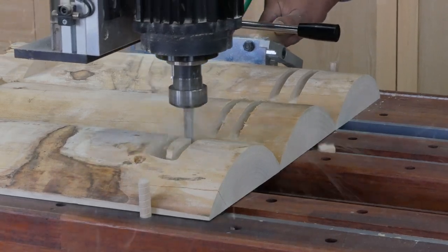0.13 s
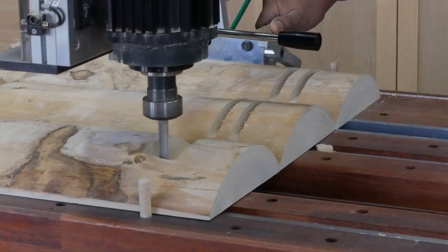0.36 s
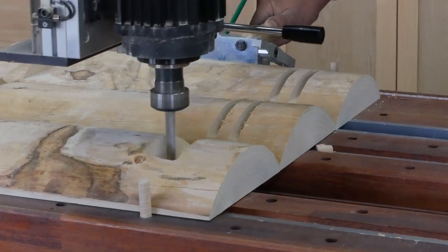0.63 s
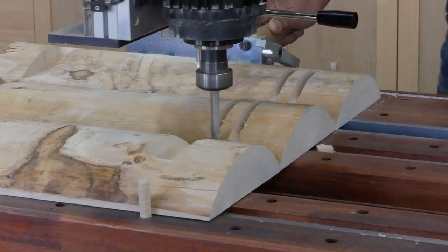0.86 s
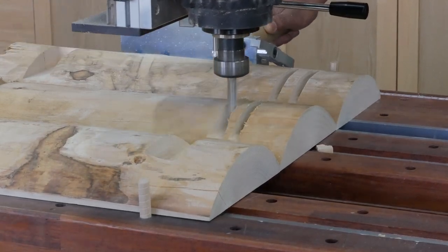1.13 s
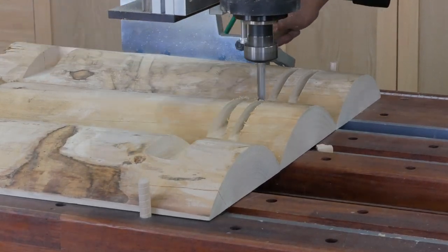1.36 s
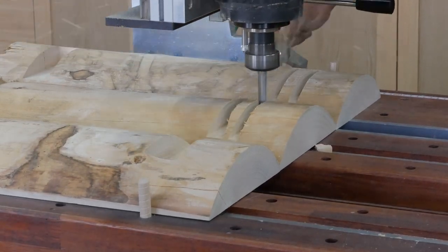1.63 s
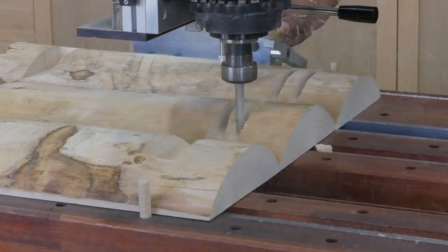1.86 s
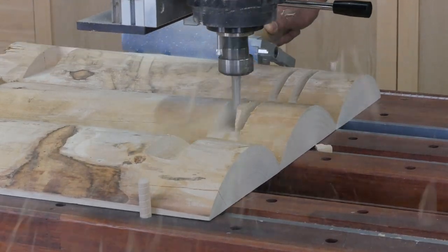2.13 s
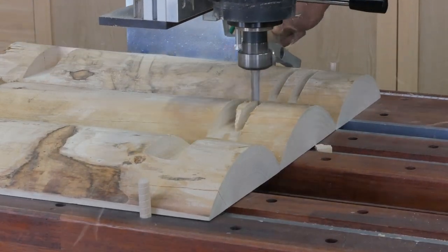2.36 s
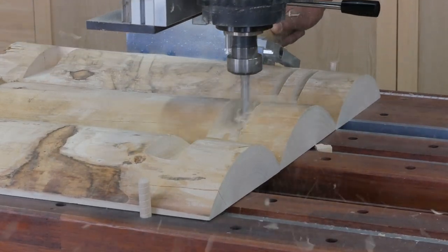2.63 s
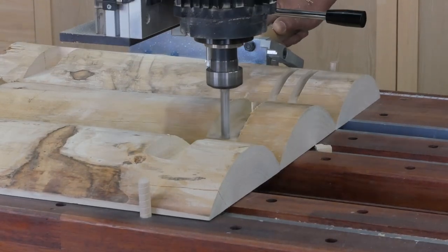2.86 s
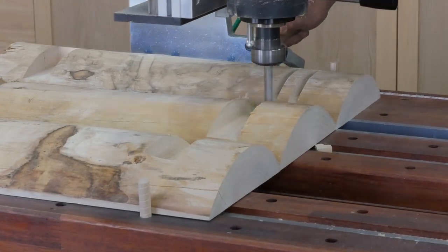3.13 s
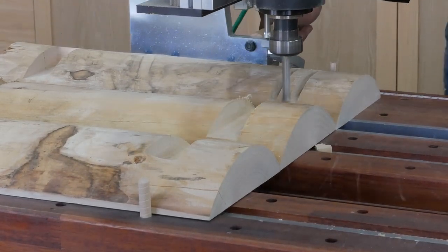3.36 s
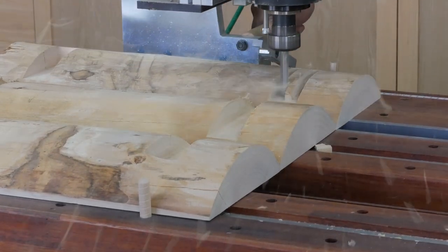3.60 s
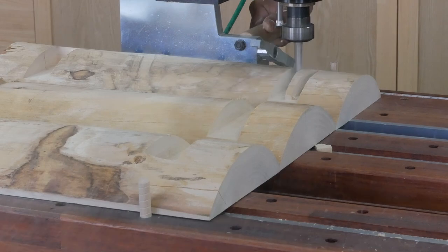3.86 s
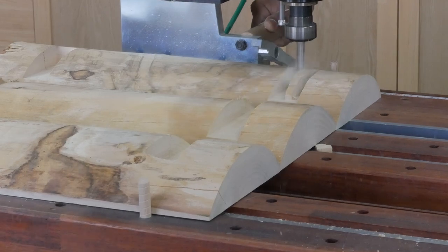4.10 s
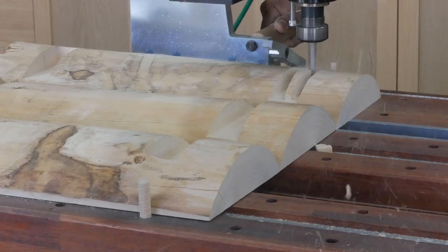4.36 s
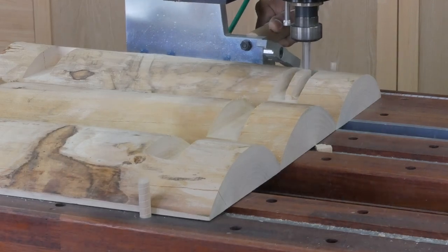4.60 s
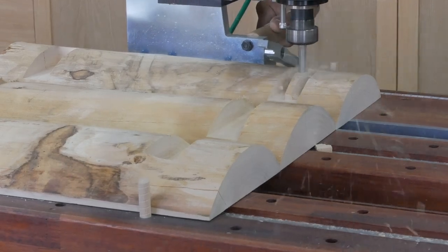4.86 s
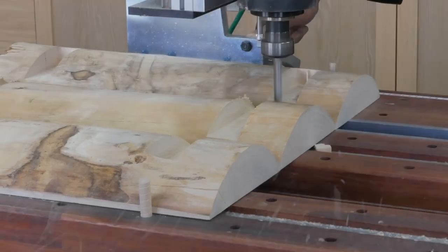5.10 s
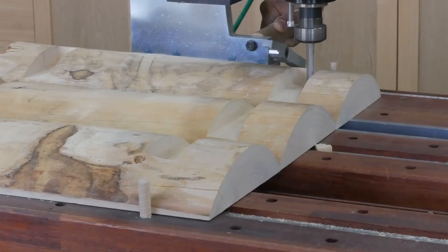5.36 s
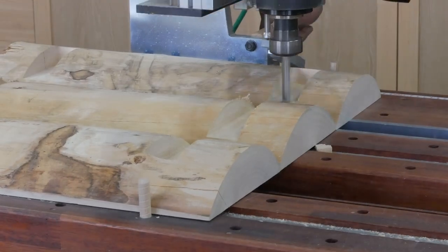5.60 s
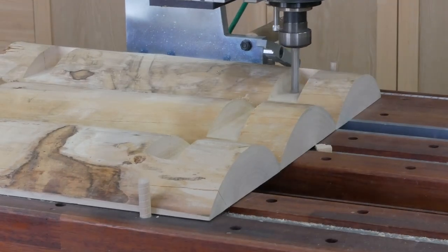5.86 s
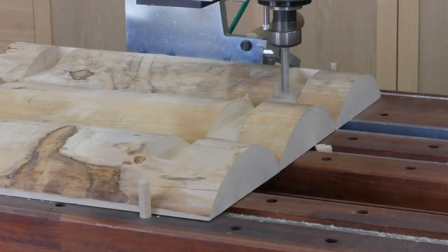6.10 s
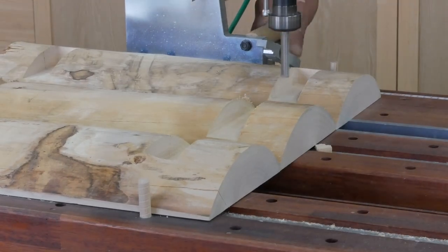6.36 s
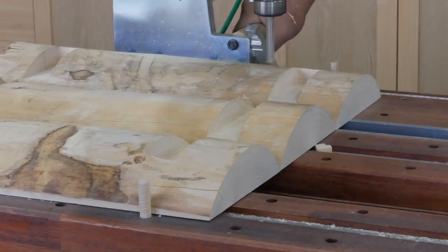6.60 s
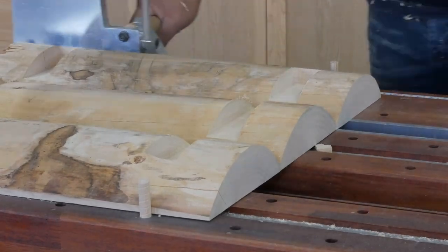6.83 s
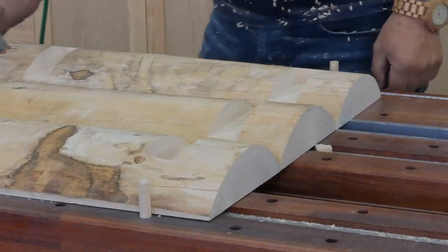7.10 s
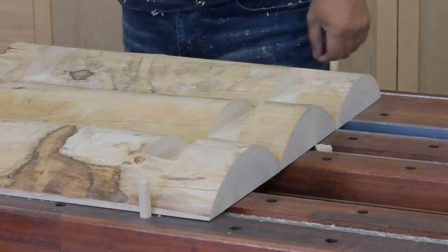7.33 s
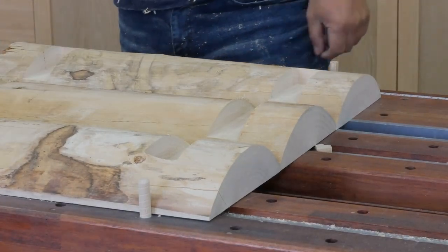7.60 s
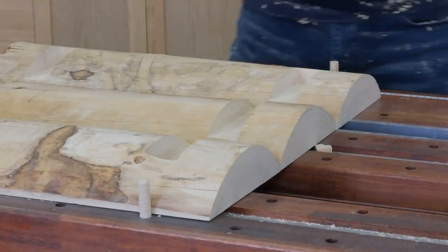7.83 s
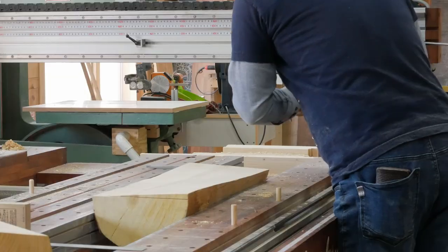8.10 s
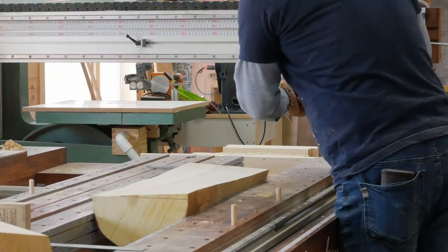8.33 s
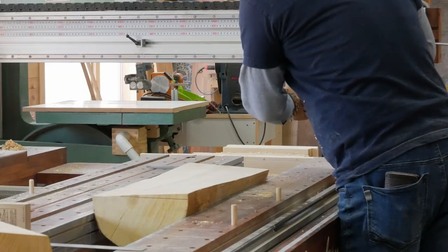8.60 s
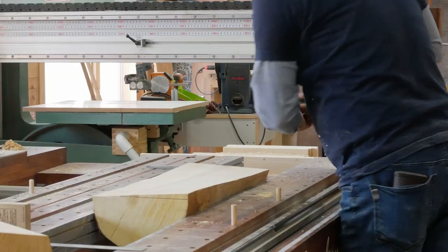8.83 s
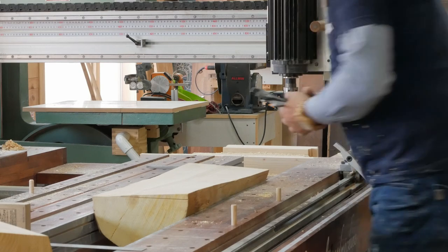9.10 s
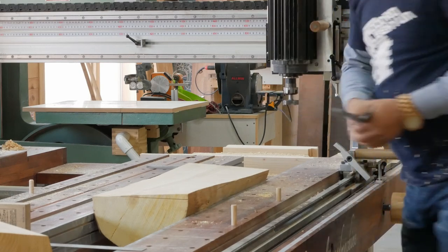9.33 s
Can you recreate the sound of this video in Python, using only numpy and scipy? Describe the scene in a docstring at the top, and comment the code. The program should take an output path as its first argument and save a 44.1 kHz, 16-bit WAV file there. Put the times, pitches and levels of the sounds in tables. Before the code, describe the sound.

High-speed router bit chews through wood with swelling whine and brief squeals, glides down to a stop, then light metallic clinks in a quiet shop.

```python
"""The first thing you hear is the whine of a fast electric spindle, over a roar of air and chips.
Its two-flute bit cuts slots in wood; each bite swells one tone of the whine, and now and then the bit chatters.
The spindle is switched off: its tones, locked to the rotor, glide down together while the roar dulls.
A hard cut leads to another spot in the quiet shop, with soft air noise and the hum of a far machine.
There metal tools clink on a bench: short bursts of noise ring the resonances of tool and bench."""
import sys
import numpy as np
from scipy import signal
from scipy.fft import rfft, irfft, next_fast_len
from scipy.io import wavfile
from scipy.ndimage import uniform_filter1d, map_coordinates

SR = 44100
rng = np.random.default_rng(int(sys.argv[2]) if len(sys.argv) > 2 else 0)


def wav_record(signal):
    """Record a signal, one row per channel, as 16-bit PCM in the file named by sys.argv[1]."""
    frames = np.transpose(np.atleast_2d(signal))
    bounded = np.clip(frames, -1, 1)
    # unit amplitude maps onto the largest positive 16-bit level
    quanta = np.round(bounded * 32767).astype(np.int16)
    wavfile.write(sys.argv[1], SR, quanta)


def how_loud(loudness_db):
    """Turn decibels into a plain amplitude multiplier (0 dB gives 1, 20 dB gives 10)."""
    steps = np.asarray(loudness_db, float) / 20
    return 10 ** steps


N = 417185
T = np.arange(N) / SR  # the time of each sample (s)


def unit(x):
    """Scale to rms 1."""
    return x / np.sqrt(np.mean(x ** 2) + 1e-20)


def along(points, hz):
    """Read a curve of (Hz, value) points on a log frequency axis."""
    f, v = np.transpose(points)
    return np.interp(np.log(hz + 1), np.log(f + 1), v)


def curves(rows):
    """One value per sample for each column after the time."""
    s, *cols = np.transpose(rows)
    return [np.interp(T, s, c) for c in cols]


def wobble(rate):
    """A smooth random curve with `rate` knots a second."""
    return map_coordinates(rng.standard_normal(int(N * rate / SR) + 4), [T * rate])


def gate(start, end):
    """1 between two times, with short ramps."""
    return np.clip(np.minimum(T - start, end - T) / 0.0027 + .5, 0, 1)


def filtered(x, response):
    """Shape a sound by a (complex) response of frequency."""
    m = next_fast_len(N + SR // 2)
    return irfft(rfft(x, m) * response(np.fft.rfftfreq(m, 1 / SR)), m)[..., :N]


def modes(table, hz):
    """Causal response of resonances: (Hz, width Hz, dB) rows, with alternating signs."""
    total = 0
    for k, (centre, width, db) in enumerate(table):
        damping = 1j * hz * width
        total = total + (-1) ** k * how_loud(db) * damping / (centre * centre - hz * hz + damping)
    return total


def rush(spectrum, patchy_db):
    """Coloured noise of rms 1 with patches of random gain in time and pitch."""
    z = signal.stft(rng.standard_normal(N), nperseg=512)[2]
    patches = uniform_filter1d(rng.standard_normal(z.shape), size=6, axis=0)
    patches = uniform_filter1d(patches, size=12, axis=1)
    noise = signal.istft(z * how_loud(patchy_db * unit(patches)), nperseg=512)[1][:N]
    return unit(filtered(noise, lambda hz: how_loud(along(spectrum, hz))))


def singing_noise(table):
    """Noise of rms 1 passed twice through the same resonances."""
    return unit(filtered(rng.standard_normal(N), lambda hz: modes(table, hz) ** 2))


def tone(turns, db):
    """A sine of given rms level from a phase in turns."""
    return np.sqrt(2) * how_loud(db) * np.sin(2 * np.pi * turns)


# bites of the flutes into the wood: start_s, length_s, strength_db, peak_place (0-1 of the length)
BITES = [(-.03, 0.15, -28.5, 0.84), (.115, 0.16, -33, 0.2), (.9, 0.36, -25, 0.62), (1.23, 0.28, -25, 0.5),
         (1.5, 0.23, -25.5, 0.95), (1.761, 0.1, -35, 0.06), (1.85, 0.13, -28, 0.6),
         (1.918, 0.109, -27.5, 0.8), (2.03, 0.155, -27, 0.75), (2.17, 0.16, -34.5, 0.9),
         (2.36, 0.13, -30, 0.6), (2.506, 0.11, -37, 0.55), (2.66, 0.056, -34.5, 0.56),
         (2.746, 0.47, -41, 0.43), (3.379, 0.2, -32, .5), (3.521, 0.32, -23.5, 0.44),
         (3.783, 0.43, -36, 0.54), (4.226, 0.15, -38, 0.3), (4.74, 0.33, -35.5, 0.1)]


def bites():
    """Gain of the flute tone: a faint idle level plus one swell for each bite."""
    flute = how_loud(-53)  # running free
    for s, length, db, peak in BITES:
        swell = np.interp(T, [s, s + peak * length, s + length], [0, 1, 0])
        flute = flute + how_loud(db) * swell ** .8  # the power sets how pointed the peak is
    return flute


# spindle tones, relative to the roar's level curve: time_s, order_1_db, order_6_db, order_10_db
SPINDLE_TONES = [(0, -23.5, -10.5, -17), (.5, -22.5, -13.5, -41), (1.4, -18, -15, -15.5),
                 (2.3, -19, -9.5, -22), (3.3, -19, -13.5, -18), (4.6, -24, -12, -11.5),
                 (6.05, -20.5, -11.5, -14.5), (6.12, -31.5, -14.5, -19), (6.3, -26, -9, -13),
                 (6.619, -19.5, -9, -13), (6.705, -5.5, -9, -17), (6.76, -20.5, -8, -26),
                 (6.9, -23, -8.5, -40), (7.06, -45, -6, -44), (7.14, -24, -10.5, -40), (7.6, -41, -23, -40)]
# order 4 flares as the bit enters: start_s, end_s, level_db
ENTRY_WHISTLES = [(0, 0.075, -28.5), (3.4, 3.622, -30.5)]


def whine(hz, turns, roar_db, flute, fast, coasting):
    """Order k is a tone at k times the rotor speed; with two flutes, order 2 is the flute tone."""
    echo_s, echo_strength = .006, .85  # from a near wall

    def order(k, db):
        """One flickering tone; high orders flicker faster, and beat with the echo as they glide."""
        flicker_db = (.9 + .35 * min(k, 8)) * wobble(20 + 8 * k)
        sound = tone(k * turns, db + flicker_db)
        if k <= 2:
            return sound
        echo_turns = k * hz * echo_s + wobble(14) / 2
        beating = np.abs(1 + echo_strength * np.exp(2j * np.pi * echo_turns)) / 1.5
        return sound * np.where(coasting, beating, 1)

    flute_db = 20 * np.log10(flute)
    sound = sum(order(k, roar_db + db) for k, db in zip((1, 6, 10), curves(SPINDLE_TONES)))
    sound += order(2, flute_db + 1.5 - 7.2 * coasting)
    sound += order(2, roar_db - 23 - ((2 * hz - 1080) / 32) ** 2)  # passing the casing's low ring
    sound += order(4, np.maximum(roar_db - 24, flute_db - 11)) * fast
    sound += sum(gate(start, end) * order(4, db) for start, end, db in ENTRY_WHISTLES)
    sound += order(8, roar_db - 27 - 40 * coasting)
    sound += order(22, roar_db - 27) * (22 * hz < 14200)  # drops into hearing as the speed falls
    return sound


# colour of the air and chips at full speed: pitch_hz, relative_level_db (per Hz)
FAST_COLOUR = [(59, -79), (100, -63.5), (283, -37.5), (335, -47.5), (1030, -18.5), (1390, -18.5),
               (2570, -6), (3240, -9), (4250, -4), (6950, -3), (8780, -9), (11800, -2.5), (15900, -6.5)]
# colour of the frame rumbling at low speed: pitch_hz, relative_level_db (per Hz)
SLOW_COLOUR = [(59, -72.5), (100, -51), (254, -23.5), (441, -29.5), (501, -20.5), (1910, -8), (2910, -3),
               (7900, -3), (9160, -15), (11300, -18), (15900, -12.5)]
# fan air singing in the vents at speed: pitch_hz, width_hz, relative_level_db (each for one of two passes)
VENTS = [(7710, 580, -5.5), (11720, 620, -7)]
# the casing's drone as it slows: pitch_hz, width_hz, relative_level_db (each for one of two passes)
CASING = [(2720, 190, 4.5), (11000, 910, 1.5)]


def roar(fast):
    """Noise of air and chips that crossfades to a frame rumble and casing drone as the speed falls."""
    at_speed = rush(FAST_COLOUR, patchy_db=1.4) + how_loud(-14.5 + 2.1 * wobble(2.5)) * singing_noise(VENTS)
    drone = how_loud(-10.5 + 2.5 * wobble(30)) * singing_noise(CASING)
    slowing = how_loud(-2.5) * rush(SLOW_COLOUR, patchy_db=1.6) + drone
    noise = np.sqrt(fast) * at_speed + np.sqrt(1 - fast) * slowing
    # reflections comb the roar: fixed random ripples along frequency
    ripple_db = 1.8 * unit(uniform_filter1d(rng.standard_normal(SR // 2), size=30))
    combed = filtered(noise, lambda hz: how_loud(np.interp(hz, np.arange(SR // 2), ripple_db)))
    return unit(combed) * noise.std()


# low thuds of the work on the table: time_s, strength_db
THUDS = [(1.815, -52), (2.253, -49), (2.684, -55), (4.075, -53.5), (4.999, -52)]


def thuds(dip_db, coasting):
    """A faint low rumble that grows with the dips and after switch-off, with dying bursts for the thuds."""
    rumble_db = -80.5 + 1.3 * dip_db + 5.5 * (coasting > 0) + 3 * wobble(24)
    knocks = sum(how_loud(db - 3.5 - 60 * (T - s).clip(0) / 0.08) * (T > s) for s, db in THUDS)
    colour = [(30, -6.5), (120, -5.0), (450, -4.5), (3000, -85.0)]  # Hz, relative dB
    return (how_loud(rumble_db) + knocks) * rush(colour, patchy_db=1.5)


# the level dips briefly: start_s, length_s, depth_db (aimed for; a short dip falls less far)
DIPS = [(0.093, 0.16, 4), (1.192, 0.11, 3.5), (1.774, 0.062, 9.5), (1.989, 0.031, 4), (2.156, 0.16, 7.5),
        (2.457, 0.13, 6.5), (2.692, 0.039, 3.5), (3.757, 0.047, 9), (3.855, .085, 5.5), (4.187, 0.17, 3.5),
        (4.786, 0.04, 10), (4.902, 0.03, 7), (4.973, 0.03, 4.5)]


def dips():
    """Depth in dB: a quick fall, a quick return and a part that lingers after close dips."""
    fall_s, return_s = 0.015, 0.071
    linger_s, linger_share = 0.39, 0.81
    quick = np.zeros(N)
    for s, length, db in DIPS:
        fall = 1 - np.exp(-np.clip(T - s, 0, length) / fall_s)
        quick += db * fall * np.exp(-np.clip(T - s - length, 0, None) / return_s)
    keep = np.exp(-1 / (linger_s * SR))
    return quick + linger_share * signal.lfilter([1 - keep], [1, -keep], quick)


# short bursts of bit chatter: start_s, length_s, pitch_hz, level_db (before throb and fade)
CHATTER = [(.136, .05, 9760, -22), (.148, .018, 15300, -22), (.183, .085, 15500, -17),
           (1.2, .18, 8650, -28), (1.77, .04, 8670, -29), (1.855, .045, 8740, -29), (1.92, .08, 8680, -29),
           (2.16, .09, 15560, -24), (2.235, .02, 14050, -25), (2.255, .012, 13700, -12.5),
           (2.269, .012, 13700, -17), (2.5, .08, 13800, -32), (3.64, .13, 8700, -26),
           (3.84, .07, 8750, -34), (4.81, .11, 8710, -27), (4.87, .06, 15100, -28),
           (4.98, .035, 15230, -26)]
# one long squeal of the bit: time_s, pitch_hz, level_db (before throb)
SQUEAL = [(3.95, 8900, -30), (4.02, 9170, -27), (4.07, 8740, -26), (4.1, 8900, -28), (4.17, 8890, -19),
          (4.285, 8810, -19), (4.39, 8840, -29)]


def chatter(turns):
    """The bit rings in bursts; each passing flute loads it, adding side tones two and four orders away."""
    waver_hz = 22 * wobble(90) + 20 * wobble(25)
    throb_db = 3.3 * wobble(77)
    bursts = [([(s, hz, db), (s + length, hz, db)], 13) for s, length, hz, db in CHATTER]
    ring = np.zeros(N)
    for rows, fade_db in bursts + [(SQUEAL, 0)]:  # bursts fade, the squeal does not
        start, end = rows[0][0], rows[-1][0]
        hz, db = curves(rows)
        progress = ((T - start) / (end - start)).clip(0, 1)
        phase = np.cumsum(hz + waver_hz * (db / 24) ** 4) / SR  # louder ringing locks steadier
        ring += gate(start, end) * tone(phase, db + throb_db - fade_db * progress ** 2)
    loaded = ring * (1 + .65 * np.cos(4 * np.pi * turns) + .3 * np.cos(8 * np.pi * turns))
    # the thin bit radiates mostly treble
    return filtered(loaded, lambda hz: 1 / np.sqrt(1 + (5800 / (hz + 1)) ** 8))


# steady-pitched drive tones late in the run-down: pitch_hz, level_db (typical; it wavers)
DRIVE_TONES = [(500, -56.5), (3002, -35), (5960, -41)]


def drive():
    """Electric drive tones that keep their pitch and fade in late in the run-down."""
    tones = sum(tone(f * T, db + 2.0 * wobble(16)) for f, db in DRIVE_TONES)
    return tones * np.clip((T - 7.1) / .5, 0, 1)


# level curve shared by roar and whine, before dips and trims: time_s, level_db
ROAR_LEVEL = [(0, -18.5), (.9, -16.5), (6.1, -16.5), (6.7, -18), (7.5, -18), (7.66, -20.5), (7.92, -25)]


def spindle():
    """The rotor sags under each bite and slows after switch-off; its speed drives all the cutting sounds."""
    free_hz, load_hz = 1195.5, 105  # rotor tone running free; its sag per unit of flute tone
    off_s, brake_hz_per_s = 6.26, 478  # switch-off; fall of the rotor tone
    dip_db, flute = dips(), bites()
    roar_db = curves(ROAR_LEVEL)[0] - dip_db
    coasting = np.clip(T - off_s, 0, None)  # seconds since switch-off
    hz = free_hz - load_hz * flute - brake_hz_per_s * coasting
    turns = np.cumsum(hz + 0.84 * wobble(25)) / SR
    fast = np.clip((hz - 450) / 700, 0, 1)  # 1 at full speed
    cutting = whine(hz, turns, roar_db, flute, fast, coasting) + how_loud(roar_db - 1.0) * roar(fast)
    return cutting + thuds(dip_db, coasting) + chatter(turns) + drive()


# colour of the shop's quiet air: pitch_hz, relative_level_db (per Hz)
SHOP_AIR = [(18, -45), (30, -13.5), (288, 0), (552, -4.5), (1000, -4), (1730, -12.5), (15000, -46.5)]
# hum of a far machine: pitch_hz, level_db (typical; it wavers)
HUM = [(695, -61), (1192, -56.5)]


def shop():
    """Soft coloured noise for the quiet air, and wavering sines for a far machine's hum."""
    hum = sum(tone(f * T, db + 1.3 * wobble(6.8)) for f, db in HUM)
    return how_loud(-45 + 0.8 * wobble(5.3)) * rush(SHOP_AIR, patchy_db=1.2) + hum


# how long the walls keep a sound going: pitch_hz, time_to_fall_60_db_s
WALLS = [(300, 0.78), (3000, 0.71), (12000, 0.39)]


def room(x):
    """The walls' answer is a noise tail in which each frequency dies at its own speed."""
    hz, t, z = signal.stft(rng.standard_normal(SR // 2), SR, nperseg=256)
    decay = how_loud(-60 * t / along(WALLS, hz)[:, None])
    tail = signal.istft(z * decay, SR, nperseg=256)[1]
    return signal.fftconvolve(x, tail / np.linalg.norm(tail))[:len(x)]


def lift_db(hz, rings_hz):
    """A lift for the resonances where the blow rings most."""
    return max(12.5 * np.exp(-(np.log(hz / peak) / .05) ** 2) for peak in rings_hz)


# blows: time_s, strength_db, first_ring_hz, second_ring_hz, bench_knock_db (relative to the strength)
CLINKS = [(8.343, -34, 7000, 2790, 10), (8.445, -40.5, 5300, 3780, 18), (8.519, -42, 3130, 5130, 19),
          (8.599, -16, 3130, 5450, 0), (8.642, -18, 6440, 6440, -6), (8.672, -12.5, 6440, 9290, -20),
          (8.69, -19, 4540, 2790, -16), (8.722, -25, 2790, 1567, -15), (8.885, -32, 2790, 4540, -23),
          (8.952, -23.5, 5130, 5130, -15), (8.99, -29, 5130, 4540, -14), (9.025, -28.5, 5200, 4540, -2),
          (9.271, -35, 6400, 9290, -11), (9.286, -32, 4540, 4540, -13), (9.32, -34, 3130, 2790, -12),
          (9.44, -31.5, 2790, 5130, -11)]
# resonances of the metal tool: pitch_hz, width_hz, relative_level_db (before each blow's changes)
TOOL = [(1567, 21, -4), (2790, 57, -5), (3130, 64, -8), (3780, 56, -8), (4500, 35, -4), (5140, 56, -3),
        (5460, 35, -5), (6430, 15, 2), (6480, 14, 0), (7400, 35, -4), (8130, 50, -12.5), (9330, 41, -3.5),
        (10800, 54, -3), (12100, 84, -9), (12900, 60, -6), (13930, 40, -3), (14860, 35, -6)]
# resonances of the bench: pitch_hz, width_hz, relative_level_db
BENCH = [(444, 34, -2), (800, 83, -0.5), (1250, 81, 0)]


def clinks():
    """Each blow is a short rattle that drives the tool's resonances, most near its own colours, and the bench."""
    rattle_s, drag_s_per_db = 0.073, 0.0046  # 60 dB decay at full scale; softer blows drag longer
    steel, blows = np.zeros(N + SR), np.zeros(N + SR)
    t = np.arange(SR // 2) / SR
    hz = np.fft.rfftfreq(SR, 1 / SR)
    for s, db, *rings_hz, knock_db in CLINKS:
        onset = 1 - np.exp(-t / (.0004 * how_loud(-.87 * db)))  # hard blows start sharper
        decay = how_loud(-60 * t / (rattle_s - drag_s_per_db * db))
        clumpy = unit(rng.laplace(size=len(t)) * how_loud(3 * wobble(218)[:len(t)]))
        rattle = decay * onset * clumpy
        struck = [(c, w, level + lift_db(c, rings_hz) + rng.normal(0, 2.3)) for c, w, level in TOOL]
        clatter = how_loud(-9.5) * modes([(3430, 7000, 0)], hz) ** 2  # broad, under the rings
        dull = 1 / (1 + 1j * hz / (19000 * how_loud(0.55 * db))) ** 2  # soft blows are duller
        hit = irfft(rfft(rattle, SR) * (modes(struck, hz) + clatter) * dull)[:len(t)]
        hit *= how_loud(db - 8.5) / np.std(hit[:SR // 30])  # level set over the first moments
        place = slice(round(s * SR), round(s * SR) + len(t))
        steel[place] += hit + how_loud(-1.5) * room(hit)
        blows[place] += how_loud(db + knock_db + 9) * rattle
    bench = filtered(blows[:N], lambda hz: modes(BENCH, hz))
    return steel[:N] + bench + how_loud(3.0) * room(bench)


def scene():
    """The spindle, then the quiet shop and the clinks, joined by a hard cut."""
    cut_s = 7.937
    later = np.clip((T - cut_s) / 0.0025 + .5, 0, 1)
    mono = spindle() * (1 - later) + (shop() + clinks()) * later
    return np.array([mono, mono])


def band_limit(x):
    """A steep low-pass at the top of the band."""
    return signal.sosfilt(signal.butter(12, 16350, fs=SR, output="sos"), x)


def record(dry):
    """Near-mono sound: a faint, flickering, blurred difference between the channels; the top treble is cut."""
    blur = rng.standard_normal(2500)
    blurred = signal.fftconvolve(dry[0], blur / np.linalg.norm(blur))[:N]
    side = how_loud(-32 + 8.9 * wobble(22)) * blurred
    # falls to a -60 dB floor by 15950 Hz
    pair = filtered(dry + [side, -side], lambda hz: 1e-3 + np.clip((15950 - hz) / 200, 0, 1) ** 2)
    return band_limit(pair)


dry = scene()
out = record(dry)
wav_record(out)
```